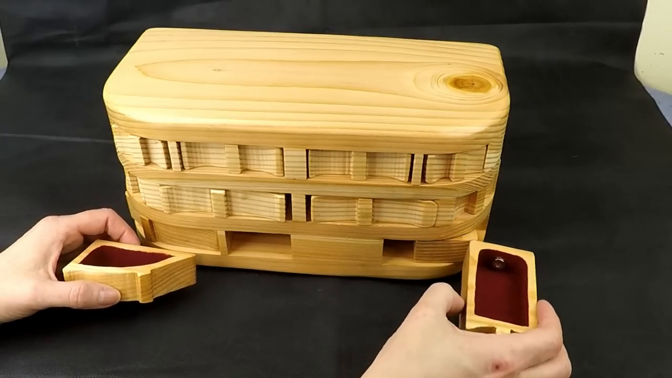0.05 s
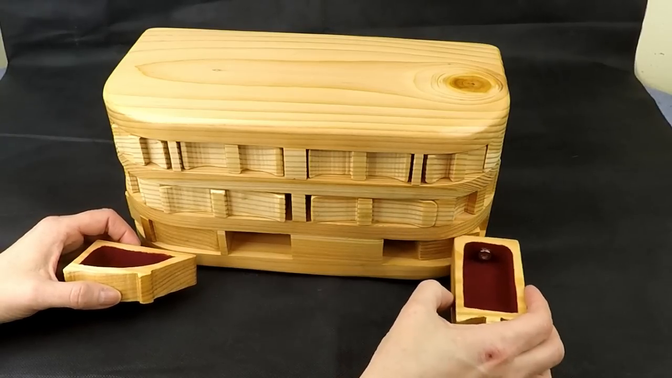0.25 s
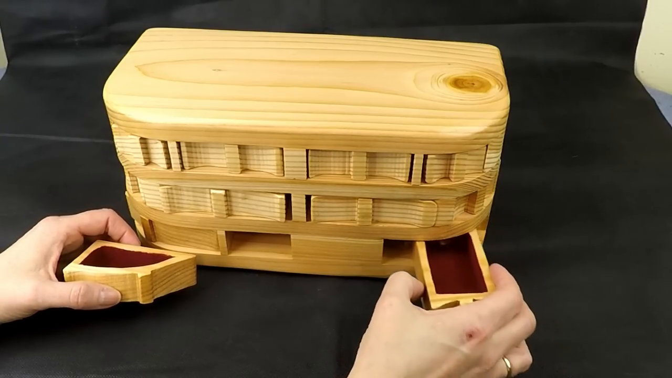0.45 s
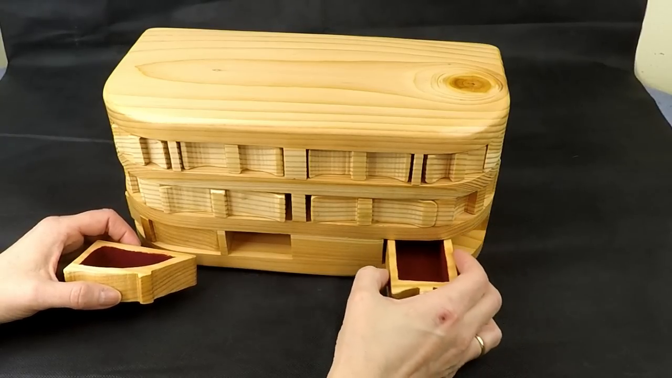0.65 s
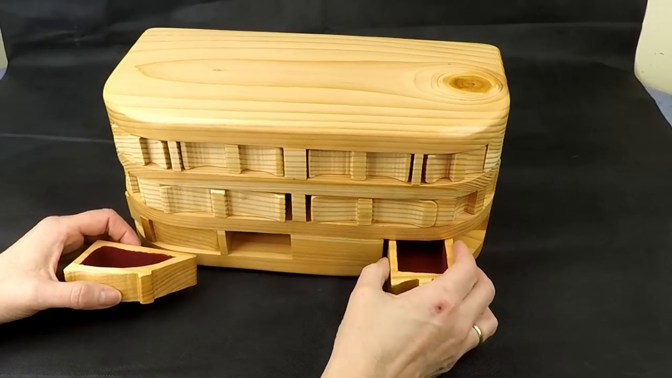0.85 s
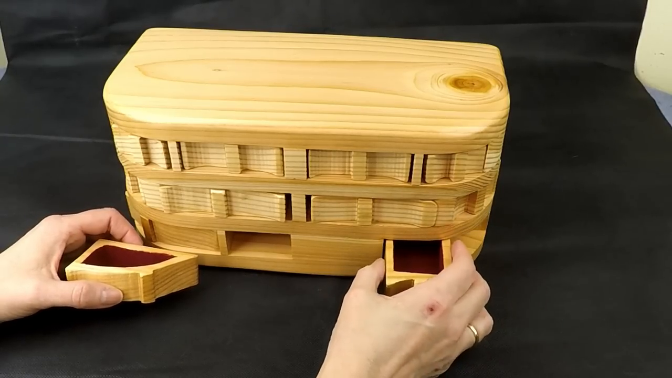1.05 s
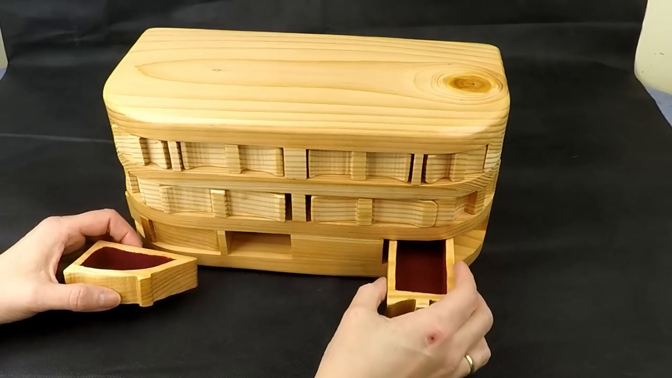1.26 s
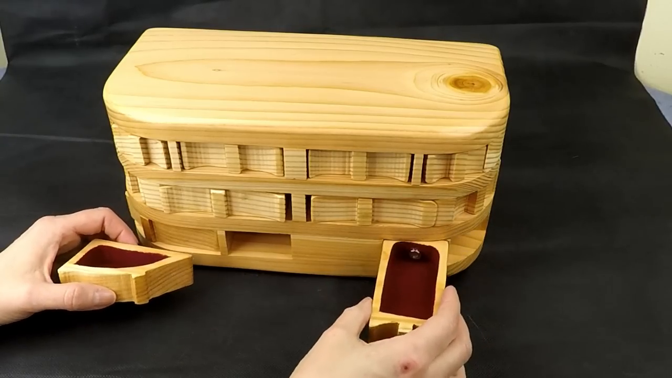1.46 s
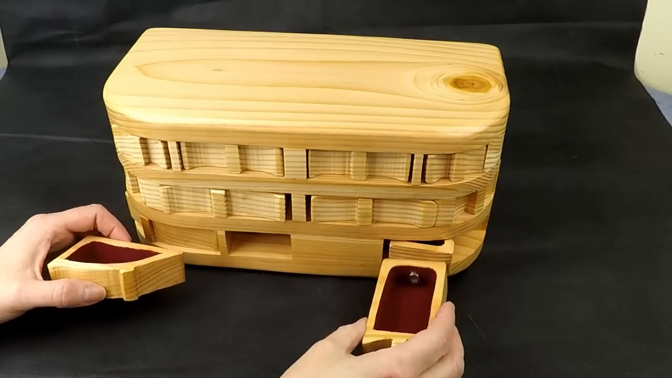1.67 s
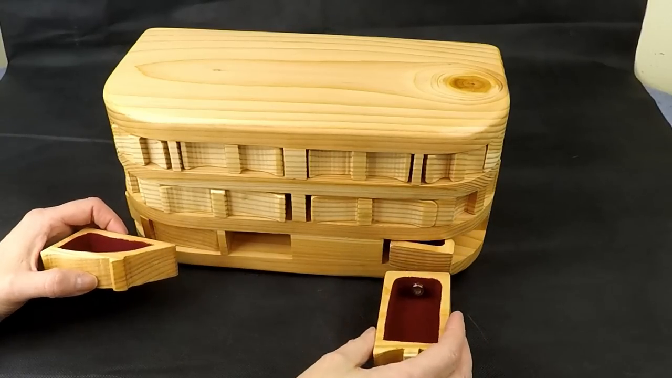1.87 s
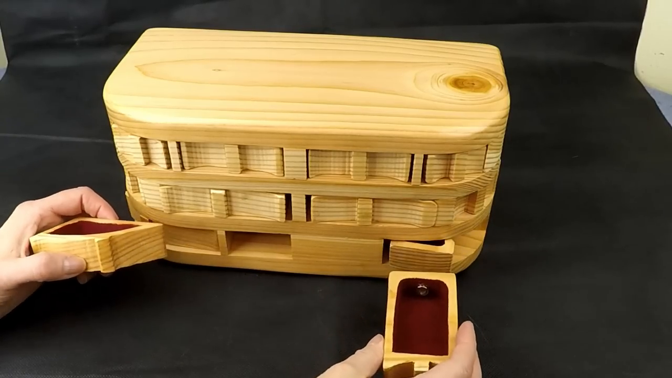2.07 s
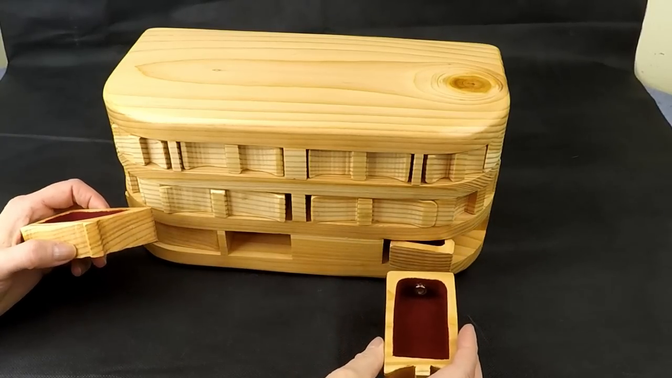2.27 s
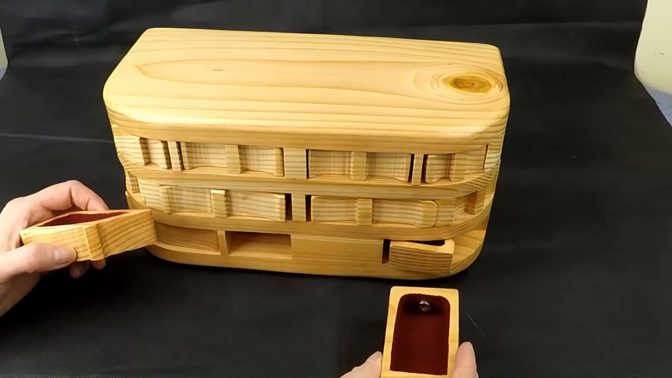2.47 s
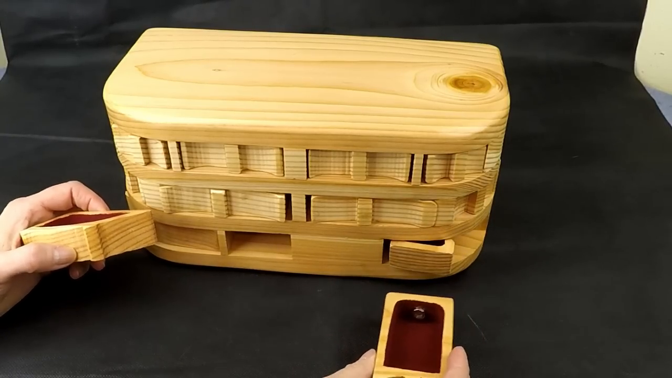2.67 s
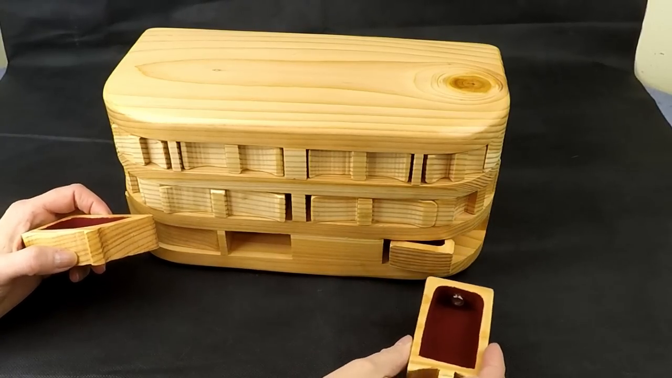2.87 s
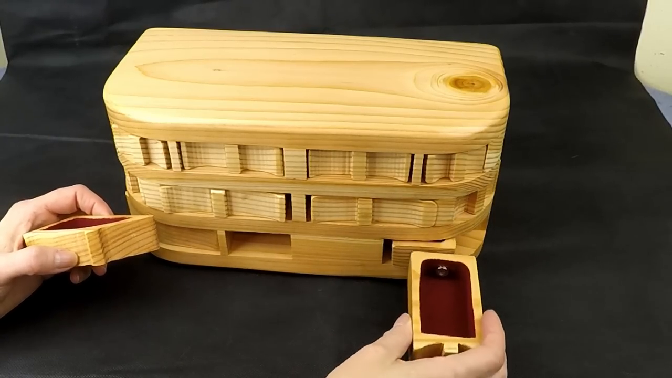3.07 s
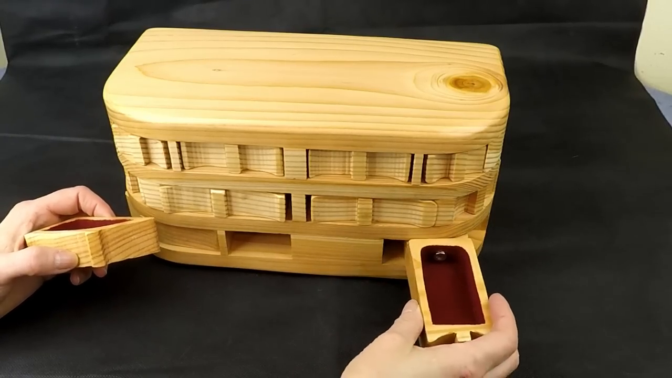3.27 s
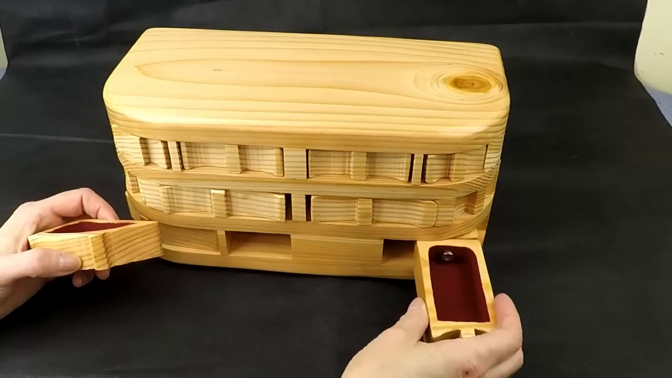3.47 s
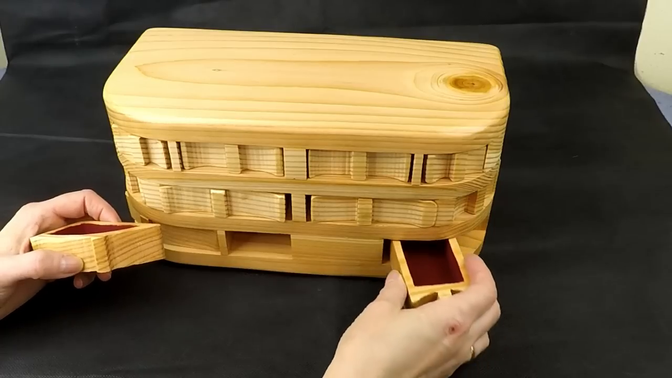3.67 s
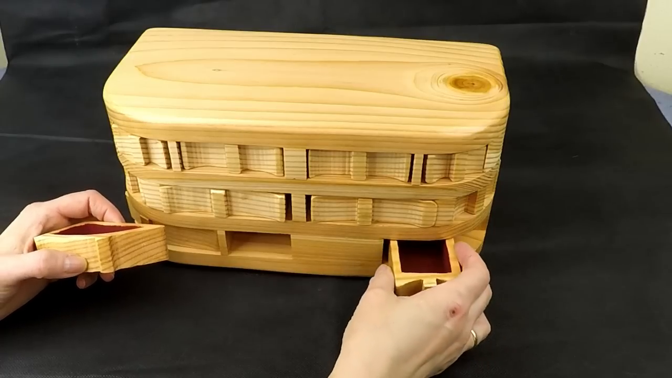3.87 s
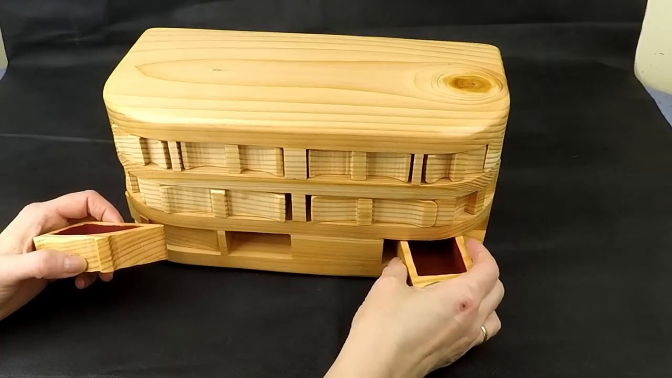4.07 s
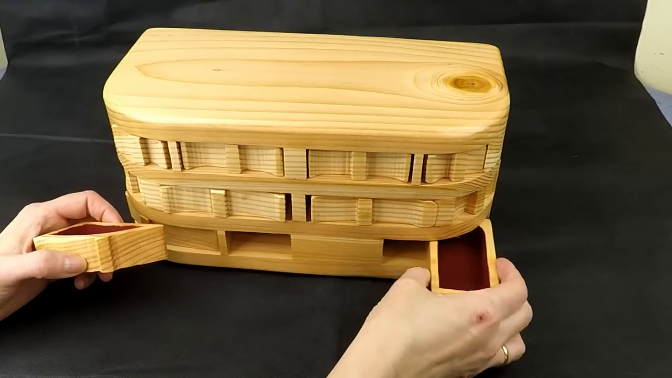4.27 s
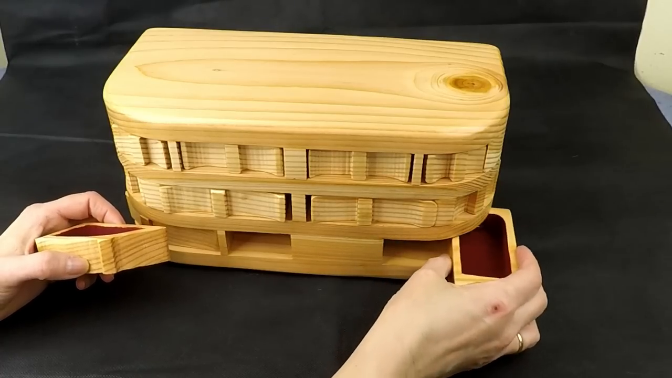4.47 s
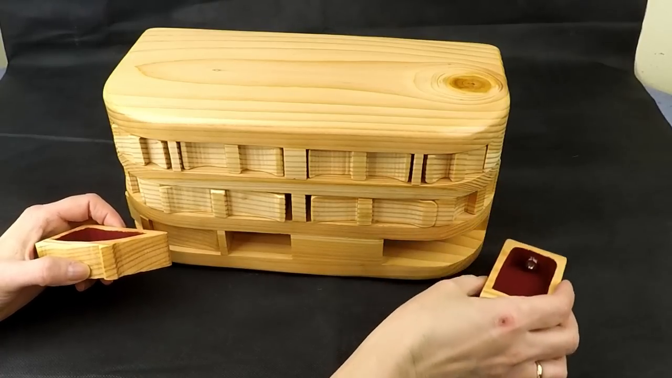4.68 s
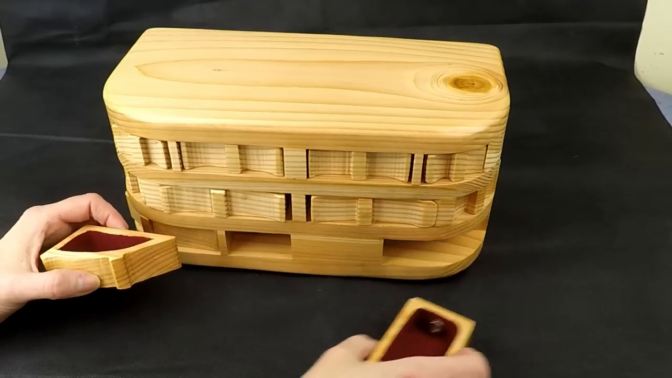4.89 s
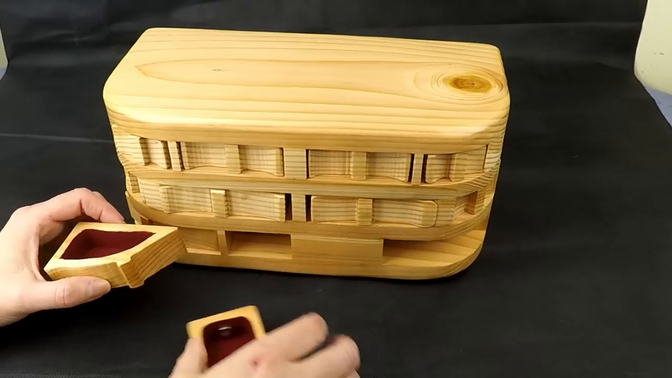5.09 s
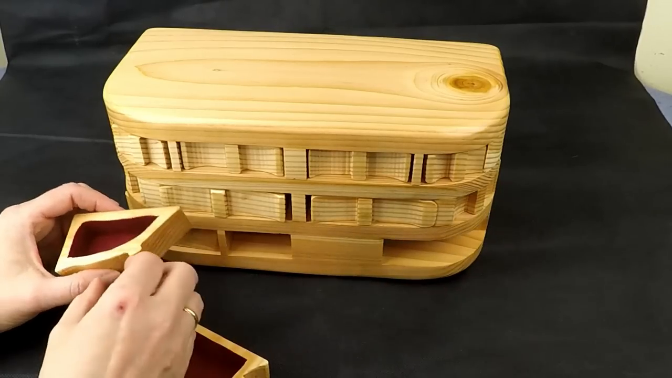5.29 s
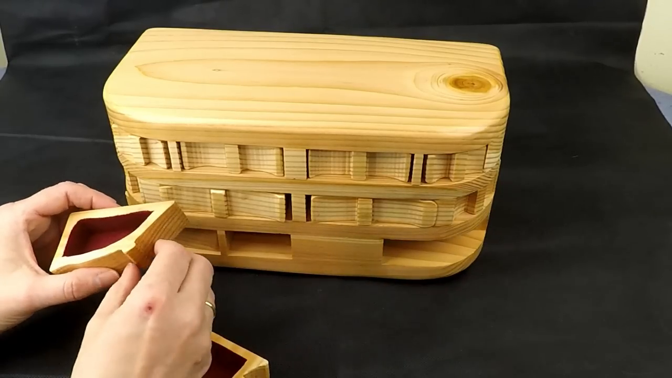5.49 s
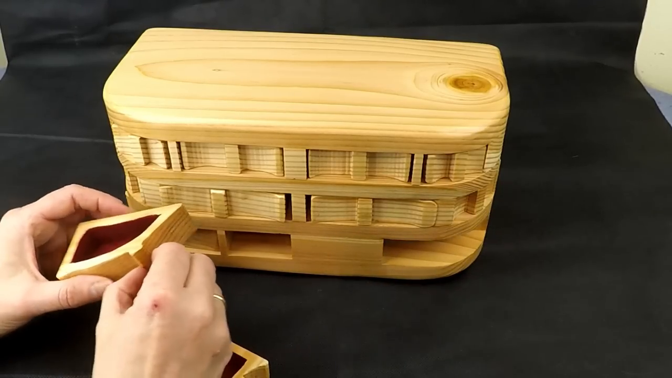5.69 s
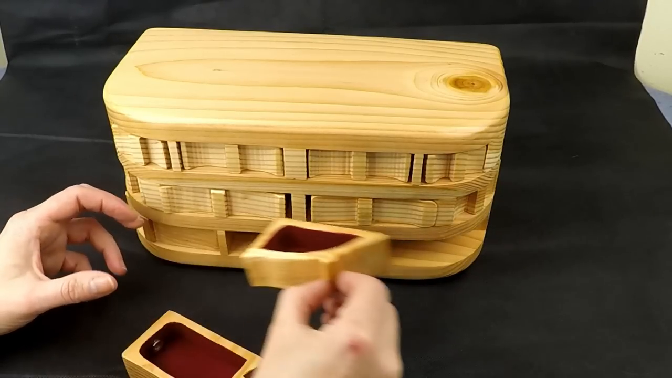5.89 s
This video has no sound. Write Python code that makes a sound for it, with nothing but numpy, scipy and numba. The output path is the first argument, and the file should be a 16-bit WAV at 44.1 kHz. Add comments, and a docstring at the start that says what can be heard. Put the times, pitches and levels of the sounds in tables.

```python
"""Close wooden knocks and scrapes: a small drawer is fumbled into a chest, pushed home and drawn out, twice.
Its edges strike and catch in the slot, ringing the wood and the hollow air inside; a second drawer
answers with light, bright taps. Hands brush and bump the cloth-covered table, fingertips skid on varnish.
Behind it all lies a small quiet room with soft hiss, low hum and the sway of the microphone stand."""
import sys
import numpy as np
from scipy import signal
from scipy.fft import rfft, irfft
from scipy.io import wavfile
from scipy.ndimage import uniform_filter1d
from numba import njit

SR = 44100
rng = np.random.default_rng(int(sys.argv[2]) if len(sys.argv) > 2 else 0)


def generate_wav(sig):
    """Save sig (samples, or channels by samples) to the path in sys.argv[1] as 16-bit PCM at SR."""
    pcm = np.round(np.clip(np.atleast_2d(sig).T, -1, 1) * 32767).astype(np.int16)
    wavfile.write(sys.argv[1], SR, pcm)


N = 261674
T = np.arange(N) / SR

# The drawer knocking on the chest. Each row: start in seconds, main ring in Hz, level in dB,
# hardness in dB, extra thud in dB, seconds for the chatter to fall by 60 dB.
KNOCKS = [(.134, 2520, -42.5, -3, -20, 0.044), (0.2333, 1620, -33, 8, 6, 0.012),
          (.266, 1760, -29.5, 4, -35, 0.071), (.339, 1760, -25, -7.5, -14, 0.022),
          (.3885, 1660, -32.5, -35, -27, 0.056), (0.461, 3100, -18.5, 0.5, -44, 0.048),
          (0.5279, 1760, -23.5, -4, -6.5, 0.024), (.591, 1650, -26.5, -6, -16, 0.038),
          (.6168, 2530, -15, 1, -19, 0.011), (0.6293, 2630, -23, 0, -8, 0.017),
          (0.6407, 2480, -11, 4, -10.5, 0.024), (.7423, 2720, -28.5, -9, -4.5, .022),
          (.7888, 1550, -31, -17, -24, 0.01), (0.9322, 1560, -26.5, -9.5, -15, 0.028),
          (.982, 2800, -44.5, -18, -8, 0.02), (1.4114, 1670, -32.5, -10, -5, 0.03),
          (1.438, 1710, -28, 8.5, -20, 0.044), (1.598, 1680, -42, -12, -8, 0.041),
          (1.6647, 2460, -30, 14.5, -39, .045), (1.678, 2480, -39, 19, -7, 0.027),
          (3.0659, 2450, -19.5, 6, -37, 0.022), (3.1327, 1780, -22.5, -1, -30, 0.015),
          (3.171, 1720, -35, 10, 9.5, 0.059), (3.2236, 1320, -30, -12, -9, 0.016),
          (3.2797, 2620, -25.5, 8, -14, 0.023), (3.379, 1660, -42, 1, -12, 0.059),
          (3.389, 1690, -30, 2, -11, 0.024), (3.463, 2410, -26.5, -7, -9, 0.044),
          (3.52, 1690, -25.5, 5, -29, 0.047), (3.538, 1750, -21.5, 2, -28, .04),
          (3.642, 3810, -45, 14, 15, 0.023), (3.6506, 3880, -15.5, 27, -7.5, 0.041),
          (3.6558, 3870, -15.5, -6, -32, 0.0078), (3.69, 1800, -14, 6.5, -13, 0.027),
          (3.754, 1460, -31.5, -3, -7, 0.03), (3.833, 1680, -37, -27, -13, 0.018),
          (3.9619, 3080, -15, -0.5, -11, 0.028), (4.179, 1500, -24.5, 4.5, -16, 0.024),
          (4.473, 1380, -28.5, -16, -3, 0.039)]
# A knock's registers: thud, hollow, wood, edge, snap. Each row: trim in dB, dB gained per dB of hardness.
KNOCK_REGISTERS = [(-0.5, 0), (1, -0.26), (0.5, 0.1353), (-12, 0.71), (-32.5, 0.6555)]
# The borders of those five registers in Hz, low to high.
REGISTER_EDGES_HZ = [150, 600, 1300, 3200, 6500, 15000]
# The wooden voice of drawer and chest. Each row: mode in Hz, width in Hz, gain in dB.
WOOD_MODES = [(501, 86, 0), (850, 79, 10), (1112, 176, 7), (1480, 170, 2.5), (1680, 70, 8),
              (1993, 190, 3.5), (2134, 200, -2), (2530, 71, 6), (2717, 190, 1), (3260, 96, 3),
              (3400, 130, -3.5), (3940, 450, 6.5), (4365, 89, 13), (4830, 250, 0.5), (5250, 150, -5),
              (6870, 2100, -4), (8600, 910, 7.5)]
# Air notes that move as the slot covers the drawer.
# Each row: time in seconds, drawer note in Hz, slot note in Hz.
AIR_NOTES = [(.2, 893, 1670), (.46, 798, 1840), (.75, 675, 1690), (1.65, 765, 1690), (3.07, 970, 1730),
             (3.55, 846, 1790), (3.75, 590, 1470), (4.18, 720, 1890), (4.25, 764, 1760), (4.33, 820, 1680),
             (4.45, 820, 1640), (4.529, 730, 1720)]
# Five strokes: fumbled home, drawn out gently, fumbled and shoved home, jiggled loose, drawn out briskly.
# Each row of a stroke: time in seconds, rubbing effort in dB.
STROKE_EFFORTS = [
    [(.16, -56), (.21, -40), (.37, -44), (.49, -36), (.565, -45.5), (.615, -29.5), (.69, -39.5),
     (.78, -40.5), (.93, -66.5)],
    [(1.11, -68), (1.16, -42), (1.24, -40), (1.46, -42.5), (1.55, -57), (1.64, -35.5), (1.68, -44),
     (1.73, -78)],
    [(3.08, -65), (3.11, -41.5), (3.19, -41), (3.33, -63), (3.43, -48), (3.5, -27), (3.58, -35),
     (3.63, -27.5), (3.73, -34), (3.79, -48)],
    [(3.9, -60.5), (3.96, -30.5), (4.0, -39), (4.06, -49.5), (4.12, -61)],
    [(4.16, -53), (4.185, -24.5), (4.25, -27), (4.33, -34), (4.45, -32.5), (4.493, -39.5), (4.52, -27.5),
     (4.61, -30.5), (4.65, -59)],
]
# The tone of each stroke. Each row, all in dB: hollow, grit, judder, slot against wood, spread of catches.
STROKE_COLOURS = [(0.5, -5, -2.5, -12, 3), (-0.5, -5, -12, 0, 1), (0.5, -6.5, -3, -4, 4.5),
                  (-7, -8.5, -13, -4, 4), (-4.5, -6, -22, 0, -0.3)]
# The fine rasp of the grain. Each row: frequency in Hz, relative level in dB.
GRIT_SPECTRUM = [(200, -45), (600, -33), (1000, 2), (1500, -38), (3000, 14), (4500, 16), (6500, 9),
                 (9000, 4.5), (11000, -5.5), (15500, -11)]
# Taps and dry scuffs on the second drawer. Each row: start in seconds, peak in dB, ring against crack in dB.
TAPS = [(1.788, -33, -14), (5.2564, -13.5, 13.5), (5.268, -35, 16), (5.2845, -25.5, 24),
        (5.456, -34.5, -12), (5.519, -27, -22), (5.535, -24, -8), (5.5476, -25, -15), (5.562, -38, -10)]
# The second drawer's voice, damped by the hand. Each row: mode in Hz, width in Hz, gain in dB.
SECOND_DRAWER_MODES = [(387, 270, -4), (2120, 90, 0), (2675, 140, 17), (2790, 56, 16), (2880, 120, -5),
                       (3400, 110, 2), (3800, 150, -25), (7210, 240, 9), (8750, 51, -10)]
# Soft bumps of hand and drawer on the table. Each row: start in seconds, level in dB, pitch in Hz.
BUMPS = [(.232, -32, 259), (0.245, -22.5, 115), (.461, -41.5, 127), (0.641, -30, 130), (0.782, -26, 108),
         (0.849, -32.5, 95), (1.411, -35, 276), (1.457, -35, 171), (1.876, -36.5, 148), (3.172, -35, 410),
         (3.653, -26.5, 119), (3.69, -27, 129), (3.96, -32, 148), (4.479, -37, 110), (4.792, -33, 144),
         (5.001, -31.5, 187), (5.04, -34, 107)]
# Two passes of skin over wood and cloth. Each row of a pass: time in seconds, hiss in dB, rub in dB.
BRUSHES = [
    [(2.3, -56, -65), (2.82, -57.5, -66), (3.03, -52.5, -59)],
    [(4.66, -50.5, -58), (4.858, -40, -47), (4.954, -45, -53), (5.06, -41, -59), (5.186, -48, -58),
     (5.298, -49, -62), (5.4, -56, -54)],
]
# The hiss of skin. Each row: frequency in Hz, relative level in dB.
SKIN_SPECTRUM = [(450, -18), (600, -2), (1500, -0.5), (4400, 0), (9000, -3), (15500, -15.5)]
# Fingertips skidding on varnish. Each row: centre in seconds, length in seconds, level in dB.
SKIDS = [(0.831, 0.035, -48.5), (3.914, 0.051, -48.5)]
# The room tone. Each row: frequency in Hz, relative level in dB.
ROOM_TONE_SPECTRUM = [(20, -20), (40, -17.5), (70, -24.5), (140, -31), (180, -30.5), (340, -33),
                      (580, -35.5), (1170, -37.5), (1450, -39), (2770, -40.5), (15500, -50)]
# The room's low hum. Each row: pitch in Hz, average level in dB.
HUM = [(45, -53.5), (49, -54), (99, -64.5), (120, -67.5)]
# The slow sway of the microphone stand. Each row: time in seconds, level in dB.
STAND_SWAY = [(.1, -46.5), (.7, -28.5), (2.9, -36), (3.25, -24), (3.8, -34), (4.7, -19.5), (5.2, -43.5),
              (5.65, -27)]


def knocks(hollow_hz, blow=3.6, crack_db=-6, hollow_db=7, main_db=11, open_hz=825, muffle_db_per_octave=20.5):
    """A blow and a brief chatter of edges ring wood and air; hard corners are brighter, square hits thud."""
    out, t = np.zeros(N), np.arange(8192) / SR
    trim_db, hardness_slope = np.transpose(KNOCK_REGISTERS)
    for start, main_hz, level_db, hardness_db, thud_db, t60 in KNOCKS:
        force = rng.standard_normal(len(t)) * fade(t, t60)
        force[0] += blow
        air_hz = hollow_hz[int(start * SR)]
        air = resonate(force, np.full(len(t), air_hz), width_hz=160.0)
        main = resonate(force, np.full(len(t), float(main_hz)), width_hz=140.0)
        crack = band(force, 230, 13000, order=1)
        wood = ring_modes(force, WOOD_MODES)
        knock = wood + undb(main_db) * main + undb(hollow_db) * air + undb(crack_db) * crack
        register_db = level_db + trim_db + hardness_slope * hardness_db
        register_db[0] += thud_db
        # once the slot covers the drawer, its air note sinks and weakens
        register_db[1] -= muffle_db_per_octave * max(np.log2(open_hz / air_hz), 0)
        for lo_hz, hi_hz, db in zip(REGISTER_EDGES_HZ, REGISTER_EDGES_HZ[1:], register_db):
            register = band(knock, lo_hz, hi_hz, order=3)
            attack_rms = np.std(register[:512])  # the first 12 ms
            add(out, start, register * undb(db) / attack_rms)
    return out


def sliding(hollow_hz, slot_hz, usual_effort_db=-41, wood_db=1, chest_db=-11, rumble_db=-7, uneven_db=1.8):
    """Stick-slip under an uneven hand drives the wood and the air in drawer, slot and chest."""
    stroke = np.searchsorted([curve[0][0] for curve in STROKE_EFFORTS[1:]], T)
    hollow_db, grit_db, judder_db, slot_db, _ = np.array(STROKE_COLOURS)[stroke].T
    effort = np.maximum(envelopes(STROKE_EFFORTS)[0], 0) / undb(usual_effort_db)
    catches = np.choose(stroke, [slips(per_second=9000, spread_db=row[-1]) for row in STROKE_COLOURS])
    force = catches * undb(uneven_db * wander(rate_hz=110))
    walls = unit(band(ring_modes(force, WOOD_MODES), 1520, 2830))
    slot = cavity(force, slot_hz, width_hz=600.0)
    scrape = (walls + undb(slot_db) * slot) / np.hypot(1, undb(slot_db))  # the two share one power
    drawer_air = cavity(force, hollow_hz, width_hz=240.0)
    chest_air = cavity(force, hz=np.full(N, 488.0), width_hz=102.0)
    judder = undb(judder_db) * unit(band(force, 50, 152, order=3))
    rumble = undb(rumble_db) * unit(band(force, 15, 46))
    # pushing harder brightens the slide: the grit grows fastest, the lows slowest
    slide = (undb(wood_db) * effort * scrape
             + undb(hollow_db) * effort ** 0.69 * (drawer_air + undb(chest_db) * chest_air)
             + effort ** 0.5 * (judder + rumble)
             + undb(grit_db) * effort ** 1.09 * colour(force, GRIT_SPECTRUM))
    return undb(usual_effort_db) * slide


def taps(blow=5.5, chatter_t60=0.065):
    """Hard corners touch the second drawer: a crack and a chatter, ringing where the wood is free."""
    out, t = np.zeros(N), np.arange(8192) / SR
    for start, peak_db, ring_db in TAPS:
        force = rng.standard_normal(len(t)) * fade(t, chatter_t60)
        force[0] += blow
        crack = band(force, 620, 6760, order=1)
        tap = crack + undb(ring_db) * ring_modes(force, SECOND_DRAWER_MODES)
        add(out, start, undb(peak_db) * tap / np.abs(tap).max())
    return out


def bumps(trim_db=-2, band_ratio=1.357, contact_s=0.00043, decay_cycles=22):
    """Padded blows give a dull, heavily damped thud; the lower, the longer."""
    out, t = np.zeros(N), np.arange(12000) / SR
    soft_attack = 1 - np.exp(-t / contact_s)
    for start, level_db, hz in BUMPS:
        push = rng.standard_normal(len(t)) * fade(t, decay_cycles / hz) * soft_attack
        thud = band(push, hz / band_ratio, hz * band_ratio)
        add(out, start, undb(level_db + trim_db) * thud / np.abs(thud).max())
    return out


def hands(hiss_db=-1, rub_db=-2):
    """Skin hisses over wood and rubs dully on the cloth."""
    hiss_swell, rub_swell = envelopes(BRUSHES)
    grains = slips(per_second=12000, spread_db=-2.0)
    hiss = hiss_swell * colour(grains, SKIN_SPECTRUM)
    rub = rub_swell * unit(band(grains, 127, 440))
    return undb(hiss_db) * hiss + undb(rub_db) * rub


def skids(whisper_hz=8700.0):
    """A dry fingertip skids with a thin high whisper."""
    swell = sum(undb(db) * np.exp(-(2 * (T - centre) / length) ** 2) for centre, length, db in SKIDS)
    return swell * cavity(rng.standard_normal(N), np.full(N, whisper_hz), width_hz=2000.0)


def room(x, early_db=-12, tail_db=-15, predelay_s=0.0072):
    """Quick reflections from table and walls, then a short tail whose treble dies first."""
    t = np.arange(SR // 2) / SR
    early, mids, treble = rng.standard_normal((3, len(t))) * (t > predelay_s)
    early = band(early, 190, 15000, order=1) * fade(t, t60=0.092)
    mids = band(mids, 420, 1480) * fade(t, t60=0.32)
    treble = 0.66 * band(treble, 2700, 19600) * fade(t, t60=0.26)
    response = (undb(early_db) * unit(early) + undb(tail_db) * unit(mids + treble)) / np.sqrt(len(t))
    return x + signal.fftconvolve(x, response)[:N]


def background(hiss_db=-50, waver_db=2.5, sway_hz=12.0, sway_trim_db=-1):
    """Steady hiss, a wavering low hum and the slow rocking of the stand."""
    hiss = colour(rng.standard_normal(N), ROOM_TONE_SPECTRUM)
    hiss *= undb(hiss_db) / np.std(band(hiss, 150, 15000))
    hum = np.zeros(N)
    for hz, db in HUM:
        level = undb(db + waver_db * wander(rate_hz=4.0))
        hum += level * np.sqrt(2) * np.sin(2 * np.pi * (hz * T + rng.random()))
    rocking_hz = sway_hz + 1.43 * wander(rate_hz=4.8)
    rocking = np.sqrt(2) * np.sin(2 * np.pi * np.cumsum(rocking_hz) / SR)
    sway_db = sway_trim_db + np.interp(T, *np.transpose(STAND_SWAY))
    return hiss + hum + undb(sway_db) * rocking


def slips(per_second, spread_db):
    """Friction as a stream of tiny catches, many small and a few large; rms 1."""
    caught = rng.random(N) < per_second / SR
    strength = rng.standard_normal(N) * undb(spread_db * np.minimum(rng.exponential(size=N), 4))
    return unit(caught * strength)


def ring_modes(x, modes):
    """Ring a body's damped modes with the force x."""
    return sum(undb(db) * signal.lfilter(*signal.iirpeak(hz, hz / width, SR), x) for hz, width, db in modes)


def cavity(x, hz, width_hz):
    """A resonance with steep sides; rms 1."""
    return unit(resonate(resonate(x, hz, width_hz), hz, width_hz))


@njit
def resonate(x, hz, width_hz):
    """State-variable band-pass whose centre may glide; gain 1 at the centre."""
    out, band_state, low_state = np.empty(len(x)), 0., 0.
    for i in range(len(x)):
        tuning, damping = np.tan(np.pi * hz[i] / SR), width_hz / hz[i]
        ring = (band_state + tuning * (x[i] - low_state)) / (1 + tuning * (tuning + damping))
        band_state = 2 * ring - band_state
        low_state += 2 * tuning * ring
        out[i] = damping * ring
    return out


def band(x, lo_hz, hi_hz, order=2):
    """Causal band-pass."""
    return signal.sosfilt(signal.butter(order, [lo_hz, hi_hz], "band", fs=SR, output="sos"), x)


def colour(x, spectrum):
    """Equalise x with a curve of (Hz, dB) points; rms 1."""
    hz, db = np.transpose(spectrum)
    bins_hz = np.maximum(np.fft.rfftfreq(len(x), 1 / SR), 1)
    gain = undb(np.interp(np.log(bins_hz), np.log(hz), db))
    return unit(irfft(rfft(x) * gain, len(x)))


def envelopes(gestures):
    """One smooth gain curve for each dB column, silent between gestures."""
    out = 0
    for rows in gestures:
        times, *columns = np.transpose(rows)
        moving = (T > times[0]) * (T < times[-1])
        out = out + np.array([undb(np.interp(T, times, db)) * moving for db in columns])
    return uniform_filter1d(out, size=300, axis=1)


def wander(rate_hz):
    """Smooth random drift; rms 1."""
    hold = int(SR / rate_hz)
    return unit(uniform_filter1d(rng.standard_normal(N)[np.arange(N) // hold], hold))


def fade(t, t60):
    """Free decay by 60 dB in t60 seconds."""
    return np.exp(-np.log(1000) * t / t60)


def add(out, start_s, x):
    """Mix x into out from start_s."""
    i = int(start_s * SR)
    out[i:i + len(x)] += x[:N - i]


def undb(db):
    """Decibels to gain."""
    return 10 ** (np.asarray(db) / 20)


def unit(x):
    """Scale to rms 1."""
    return x / np.sqrt(np.mean(x ** 2) + 1e-18)


def scene():
    """Everything on the table, heard in the room, in mono."""
    times, *notes = np.transpose(AIR_NOTES)
    hollow_hz, slot_hz = (np.interp(T, times, hz) for hz in notes)
    table = knocks(hollow_hz) + sliding(hollow_hz, slot_hz) + taps() + bumps() + hands() + skids()
    return (room(table) + background())[None]


def record(dry, ceiling=0.94, release_db_per_s=45., top_hz=15600):
    """A limiter holds the hardest knocks and recovers slowly; the top is cut."""
    over_db = 20 * np.log10(np.maximum(np.abs(dry) / ceiling, 1))
    recovery_db = release_db_per_s * T
    duck_db = np.maximum.accumulate(over_db + recovery_db) - recovery_db
    high_cut = signal.ellip(10, .2, 70, top_hz, fs=SR, output="sos")
    return signal.sosfilt(high_cut, dry * undb(-duck_db))


dry = scene()
out = record(dry)
generate_wav(out)
```